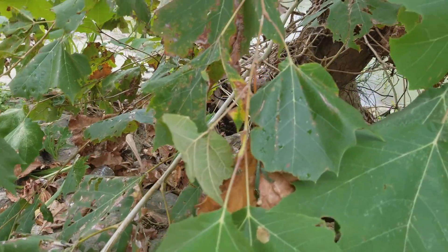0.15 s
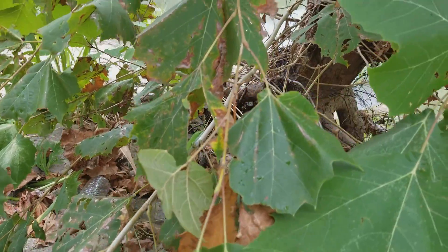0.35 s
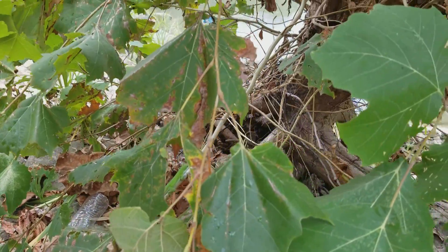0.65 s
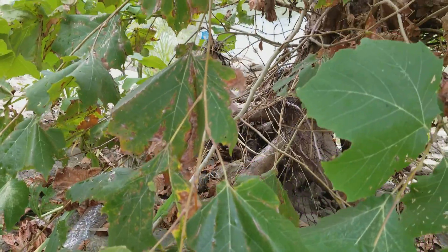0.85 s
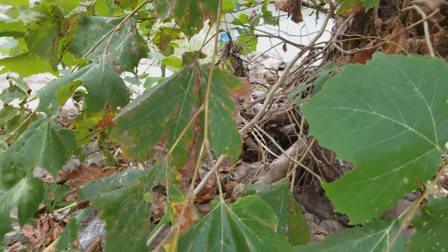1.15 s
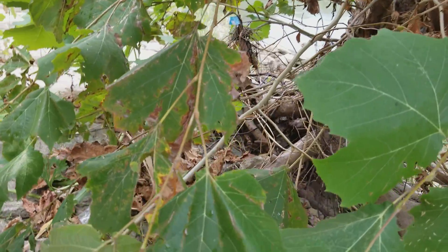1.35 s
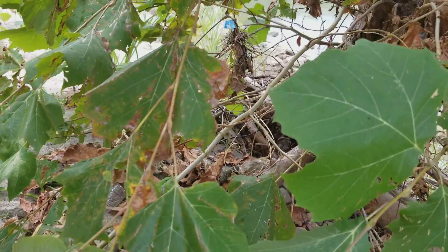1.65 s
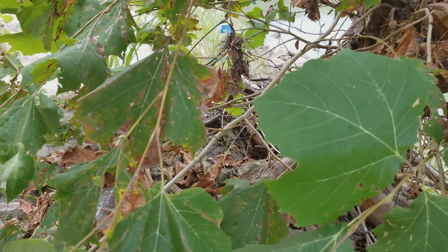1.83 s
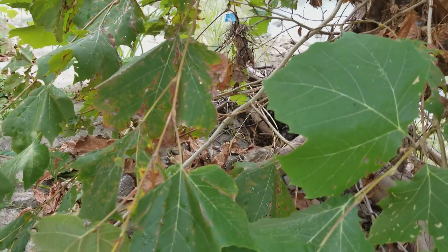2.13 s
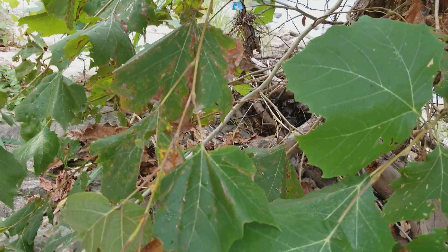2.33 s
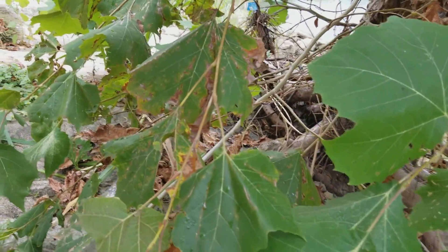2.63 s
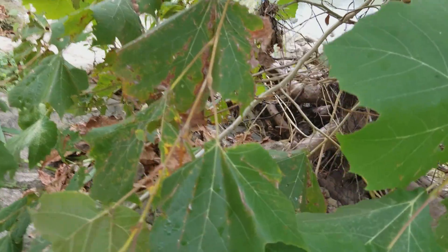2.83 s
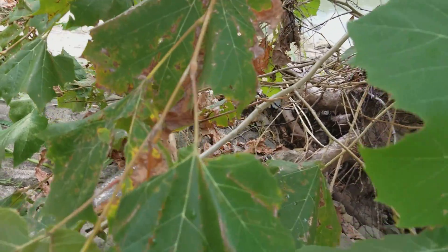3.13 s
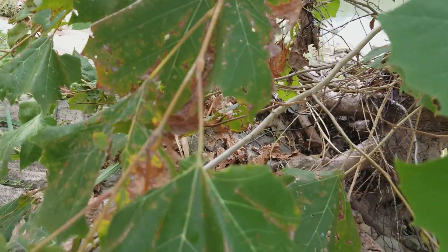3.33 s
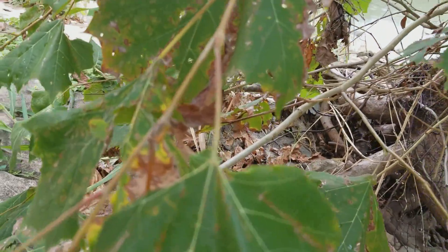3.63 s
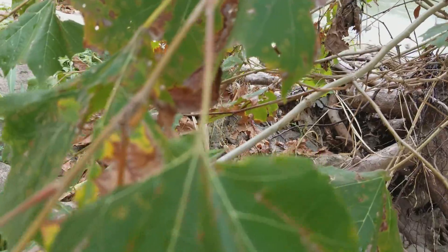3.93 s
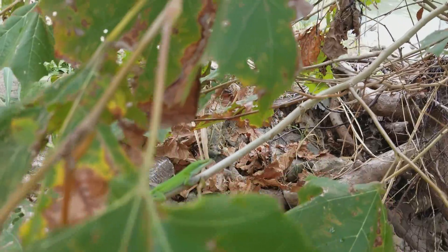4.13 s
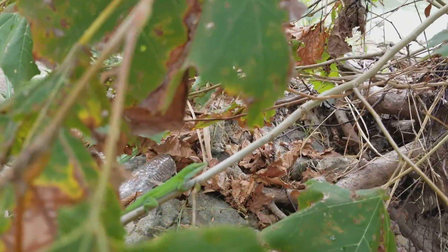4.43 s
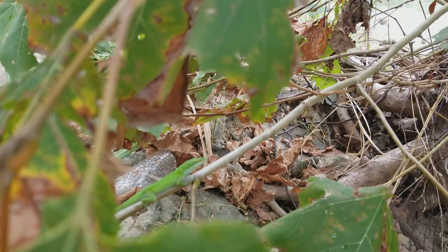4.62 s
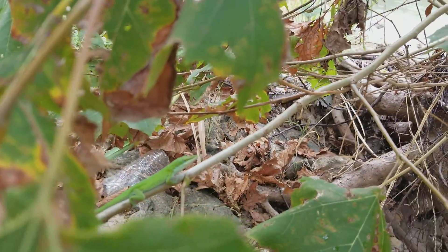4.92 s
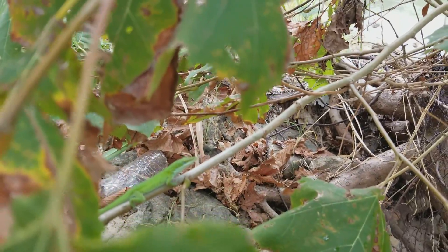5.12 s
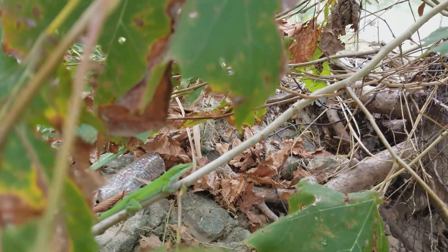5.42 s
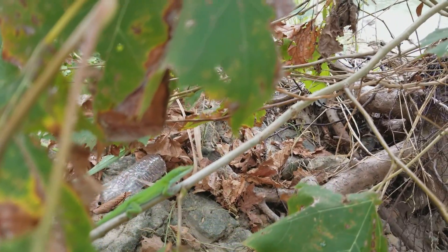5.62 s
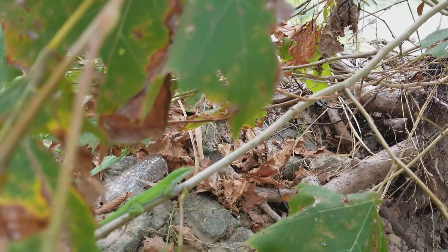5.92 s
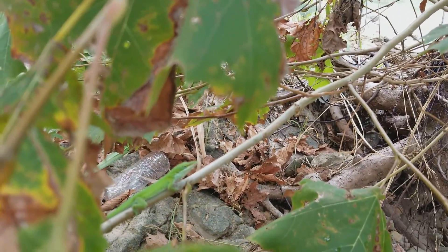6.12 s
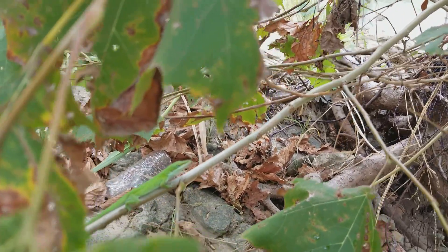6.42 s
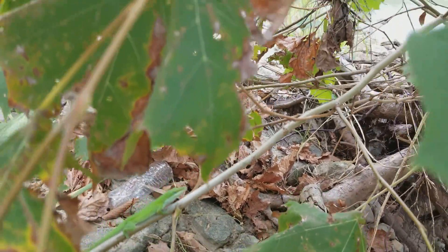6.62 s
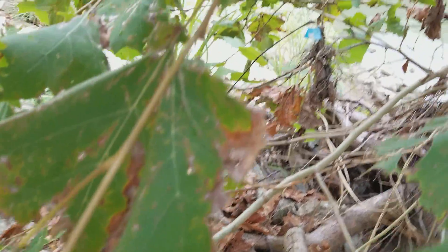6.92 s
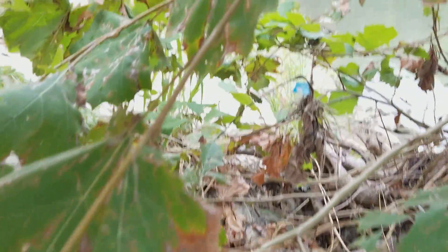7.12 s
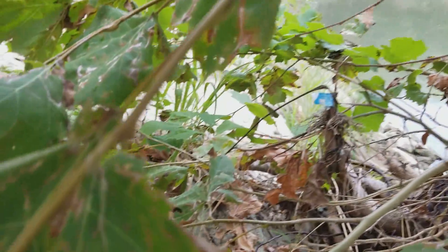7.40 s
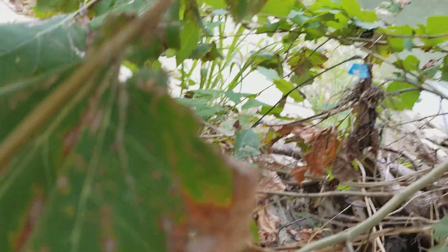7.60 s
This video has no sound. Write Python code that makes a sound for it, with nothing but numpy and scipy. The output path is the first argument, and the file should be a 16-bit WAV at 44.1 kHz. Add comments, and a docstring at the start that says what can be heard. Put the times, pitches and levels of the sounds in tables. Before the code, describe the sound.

From 0 to 0.5 s a leaf scrapes grainily over the left side of the microphone, with loud flicks and an airy pop at about 0.3 s and a last flick as it slips off near 0.48 s. A high pulsing bush cricket buzzes until 1.7 s, with light twig ticks and thin rising bird calls. From 2.3 to 2.8 s leaves swish, litter crunches, a sharp twig cracks at 2.5 s and a dull knock bumps the camera at 2.7 s. The loud cricket returns from 2.6 to 5.2 s; birds chirp and slur around 3 s, faint far tones swell briefly, and crisp snaps come near 3.8 s. A quick bird trill runs from 4.3 to 5 s, and soft whistles follow at 5.3 and 7.4 s. From 6.4 to 7.7 s brush swishes, crunches and snaps again. Deep rumble, swelling low rush and thin hiss continue throughout.

```python
"""A leaf scrapes over the left microphone and flicks off it: grainy friction noise, short bursts and air taps.
Someone edges through dry brush with a handheld camera: crackle swishes and crunches, noise bursts snap as
twigs, and damped sines bump the camera. Small birds (gliding sines) and bush crickets (pulsed high noise) sing
over a far drone of wavering tones, a deep rumble, a swelling low rush and a thin hiss (shaped noise)."""
import sys
import numpy as np
from scipy import signal
from scipy.fft import rfft, irfft, next_fast_len
from scipy.io import wavfile
from scipy.ndimage import uniform_filter1d, map_coordinates

SR = 44100
rng = np.random.default_rng(int(sys.argv[2]) if len(sys.argv) > 2 else 0)


def master_out(mix):
    """Clip the mix to full scale and print it as 16-bit PCM to the path in sys.argv[1]."""
    frames = np.transpose(np.atleast_2d(mix))
    ceiling = np.clip(frames, -1, 1)
    pcm = np.round(ceiling * 32767).astype(np.int16)
    wavfile.write(sys.argv[1], SR, pcm)


N = 342216
TIME_S = np.arange(N) / SR


def amp(db):
    """Decibels to gain."""
    return 10 ** (np.asarray(db) / 20)


def unit(x):
    """Scale to rms 1."""
    return x / np.sqrt(np.mean(x ** 2) + 1e-20)


def along(points, hz):
    """Interpolate (f/Hz, value) points on a log frequency axis."""
    f, value = np.transpose(points)
    return np.interp(np.log(hz + 1), np.log(f + 1), value)


def tilt(tilt_db, hz):
    """Treble tilt in dB: tends to tilt_db per octave at high f, flattens in the bass."""
    return tilt_db * np.log2(hz / 1000 + .5)


def wobble(rate_hz, size=N):
    """Smooth random curve, rate_hz knots per second."""
    knots = rng.standard_normal(int(size * rate_hz / SR) + 4)
    return map_coordinates(knots, [np.arange(size) * rate_hz / SR])


def swells(rows, rest_db=-120):
    """Level in dB of exponential swells (t/s, level/dB, rise/s, fall/s), power-summed on a resting level."""
    t = np.arange(0, N, 32) / SR
    power = amp(rest_db) ** 2
    for s, db, rise_s, fall_s in rows:
        power = power + (amp(db) * np.exp(np.minimum((t - s) / rise_s, (s - t) / fall_s))) ** 2
    return np.interp(TIME_S, t, 10 * np.log10(power))


def filtered(x, gain):
    """Multiply the spectrum of x by gain(hz)."""
    n = x.shape[-1]
    m = next_fast_len(n + 4096, real=True)
    return irfft(rfft(x, m) * gain(np.fft.rfftfreq(m, 1 / SR)), m)[..., :n]


def pan(db):
    """Left and right gains, mean 1, for a left-minus-right level difference."""
    g = amp([[db / 2], [-db / 2]])
    return g / g.mean()


def add(track, s, sound):
    """Mix a sound into a track from time s, clipped to the track."""
    start = round(s * SR)
    part = sound[..., max(-start, 0):max(N - start, 0)]
    track[..., max(start, 0):][..., :part.shape[-1]] += part


# left-right correlation: (f/Hz, correlation 0-1)
STEREO_CORRELATION = [(60, 1), (290, 0.94), (640, 0.69), (1400, 0.22), (3000, 0.0056)]


def spread(pair, spectrum, tilt_db=0):
    """Colour two unrelated signals into stereo of rms 1: bass shared, treble not."""
    def gain(hz):
        turn = np.arccos(np.clip(along(STEREO_CORRELATION, hz), -1, 1)) / 2
        return amp(along(spectrum, hz) + tilt(tilt_db, hz)) * [np.cos(turn), np.sin(turn)]
    mid, side = filtered(pair, gain)
    return unit(np.array([mid + side, mid - side]))


def crackle(size, rate_hz, scatter_db, smooth):
    """Tiny fractures of uneven strength, each a brief shiver, on a bed of sliding noise; two channels."""
    hits = rng.random(size) < rate_hz / SR
    strength = hits * amp(scatter_db * np.clip(rng.standard_normal(size), -2, 2))
    power_decay_s = .0004
    shiver = np.sqrt(signal.lfilter([1], [1, -np.exp(-1 / (power_decay_s * SR))], strength ** 2))
    return unit(shiver * rng.standard_normal((2, size))) + smooth * rng.standard_normal((2, size))


def patches(x, depth_db, size=128):
    """Shifting resonances of flexing matter: smoothed random gain over time and frequency; rms 1."""
    z = signal.stft(x, nperseg=size)[2]
    field = uniform_filter1d(rng.standard_normal(z.shape[-2:]), 2, 0)
    field = uniform_filter1d(field, 5, 1)
    gain = amp(depth_db * np.clip(unit(field), -2, 2))
    return unit(signal.istft(z * gain, nperseg=size)[1][..., :x.shape[-1]])


def echo(x, t60_s, onset_s):
    """Diffuse answer of the surrounding growth: decaying noise, different on each side."""
    t = np.arange(int(SR * t60_s) + 2) / SR
    tail = rng.standard_normal((2, len(t))) * amp(-60 * t / t60_s) * (1 - np.exp(-t / onset_s))
    return signal.fftconvolve(np.atleast_2d(x), tail / np.linalg.norm(tail[0]), axes=1)[:, :N]


# resonances of the leaf on the microphone port: (f/Hz, width/Hz, lift/dB)
PORT_RESONANCES = [(687, 78, 6), (936, 40, 1.5), (1130, 80, 6), (1370, 35, 2.5), (1450, 35, 2),
                   (1880, 60, 4), (2150, 66, 3), (2600, 76, 0.5), (3540, 600, 0)]


def port_colour(x, spectrum, tilt_db=0):
    """Contact sound through the resonant leaf and microphone port, rms 1."""
    def gain(hz):
        lift_db = sum(db / (1 + (2 * (hz - f) / width) ** 2) for f, width, db in PORT_RESONANCES)
        return amp(along(spectrum, hz) + lift_db + tilt(tilt_db, hz))
    return unit(filtered(x, gain))


# leaf resting on the microphone until it slides off
CONTACT_DB, RELEASE_S, RELEASE_FALL_S = -45.5, .475, 0.021
# harder drags: (t/s, level/dB, rise/s, fall/s)
HARD_DRAGS = [(.004, -30, 0.0058, 0.0041), (.055, -36, 0.027, 0.037), (.272, -35, .025, 0.032),
              (.325, -32, .015, 0.02), (.385, -32.5, 0.018, .012)]
# sliding leaf spectrum: (f/Hz, relative density/dB)
DRAG_SPECTRUM = [(50, -22.5), (250, 7), (560, 8), (1000, -1), (1350, 2), (1750, -7), (2500, -8),
                 (3900, -11.5), (5500, -23.5), (10000, -22), (15500, -33.5)]
# leaf catching and flicking: (t/s, level/dB, Gaussian sigma/s, treble tilt/dB per octave)
LEAF_FLICKS = [(.006, -24, 0.00067, 7), (0.013, -32, 0.0056, 2), (0.2218, -29, 0.00048, 0.5),
               (.3045, -19.5, 0.0027, -0.5), (0.3071, -13.5, 0.0024, 2), (.3105, -20.5, 0.0025, 1),
               (0.3207, -14.5, 0.00011, 8.5), (.3413, -27, 0.00046, -2.5), (0.459, -34, 0.0026, 3),
               (0.4794, -20, 0.00058, 11), (.491, -36, 0.0018, 6)]
# flick spectrum before tilt: (f/Hz, relative density/dB)
FLICK_SPECTRUM = [(30, -16.5), (120, 5.5), (300, -0.5), (500, -3.5), (700, -7), (1000, -1), (1250, -1),
                  (1750, -10.5), (2400, -10.5), (3900, -15.5), (6000, -24), (10000, -30), (15500, -31)]
# leaf edge tapping the port: (t/s, peak/dB, decay/s)
PORT_TAPS = [(0.3187, -3.5, 0.00044), (0.3422, -16.5, 0.0015)]


def leaf_on_microphone():
    """A leaf drags over the left port, sticks and slips free; little of it leaks to the right one."""
    touching = np.exp(-np.maximum(TIME_S - RELEASE_S, 0) / RELEASE_FALL_S)
    grains = crackle(N, rate_hz=650, scatter_db=5.0, smooth=0.6)[0]
    friction = port_colour(patches(grains, depth_db=4.0, size=512), DRAG_SPECTRUM)
    left = touching * amp(swells(HARD_DRAGS, CONTACT_DB) + 0.74 * wobble(90)) * friction
    t = np.arange(-SR // 20, SR // 20) / SR
    for s, db, sigma_s, tilt_db in LEAF_FLICKS:
        shape = np.exp(-.5 * (t / sigma_s) ** 2)
        slip = port_colour(shape * rng.standard_normal(len(t)), FLICK_SPECTRUM, tilt_db)
        add(left, s + t[0], amp(db) * slip * np.sqrt(np.mean(shape ** 2)))
    for s, db, decay_s in PORT_TAPS:
        u = t[t >= 0] / decay_s
        add(left, s, amp(db) * (1 - u) * np.exp(-u))  # a push of air and its rebound
    leak_db = [(100, -20), (1300, -49.5), (5000, -35), (14000, -24.0)]  # (f/Hz, gain/dB)
    right = filtered(left, lambda hz: amp(along(leak_db, hz)))
    return np.array([left, right])


# dull bumps on the camera: (t/s, left-right mean peak/dB, f/Hz, t60/s, left minus right/dB)
CAMERA_BUMPS = [(0.308, -30, 152, 0.055, 27), (.319, -38, 375, 0.053, 34), (.341, -30.5, 315, 0.064, 40),
                (0.379, -30, 248, 0.015, 42), (.478, -32, 285.3, 0.012, 25), (2.7165, -26, 514, 0.021, 4),
                (2.7152, -28.5, 233, 0.029, 1.5), (2.7202, -37, 157, 0.053, 0), (7.15, -39, 266, 0.022, 1)]


def bumps():
    """Soft knocks set the camera body swinging for a few cycles: damped sines."""
    out, t = np.zeros((2, N)), np.arange(SR // 8) / SR
    for s, db, hz, t60_s, lean_db in CAMERA_BUMPS:
        onset = (1 - np.exp(-t / 0.00071)) ** 2
        swing = np.sin(2 * np.pi * hz * t) * amp(-60 * t / t60_s) * onset
        add(out, s, -amp(db) * pan(lean_db) * swing / abs(swing).max())
    return out


CALM_DB, STIR_FLUTTER_DB = -88, 6  # foliage left alone; leaves catch and let go
# swells of stirring foliage, before flutter: (t/s, level/dB, rise/s, fall/s)
FOLIAGE_STIRS = [(.1, -66, .2, .25), (2.0, -69, .08, .07), (2.58, -54, .2, .1), (2.97, -58.5, .08, .28),
                 (4.4, -73, .5, .5), (5.05, -67, .1, .14), (5.47, -64.5, .12, .18), (6.5, -65, .14, .2),
                 (6.87, -59.5, .1, .17), (7.3, -60, .09, .1), (7.52, -57.5, .08, .25)]
SWISH_GAIN_DB = 4
# leaves sweeping past: (t/s, level/dB before SWISH_GAIN_DB, rise/s, fall/s, treble tilt/dB per octave)
LEAF_SWISHES = [(.463, -57.5, .008, .012, 1.5), (2.388, -46.5, 0.028, 0.05, -1.4),
                (2.536, -47, 0.033, 0.032, -0.4), (6.435, -51, 0.03, 0.023, 1),
                (6.495, -47.5, 0.0036, 0.0085, -2), (6.86, -57, 0.06, 0.02, 4.5),
                (6.898, -43.5, 0.0017, 0.0056, -2.5), (6.922, -42.5, 0.02, 0.015, 2),
                (7.033, -41, 0.0037, 0.0047, -6), (7.154, -56.5, .001, 0.026, -7),
                (7.343, -48, 0.00061, .003, -8), (7.604, -46.5, .001, 0.0037, -4.5)]
# leaf spectrum: (f/Hz, relative density/dB)
LEAF_SPECTRUM = [(150, -25.5), (450, -12.5), (700, -7.5), (1200, -4), (1750, 0.5), (2300, 0), (2900, -2.5),
                 (3700, 0.5), (5000, 2), (7000, -2), (10000, -1), (15500, -9.5)]


def foliage():
    """Leaves stir in clumps of fine crackle and swell into a swish where one sweeps past."""
    grains = spread(crackle(N, rate_hz=710, scatter_db=1, smooth=1.0), LEAF_SPECTRUM)
    stir = patches(grains, depth_db=2.0, size=256)
    flutter_db = STIR_FLUTTER_DB * wobble(11) + 0.92 * wobble(70)
    out = amp(swells(FOLIAGE_STIRS, CALM_DB) + flutter_db) * stir
    t = np.arange(-SR // 5, SR // 4) / SR
    for s, db, rise_s, fall_s, tilt_db in LEAF_SWISHES:
        swell = np.exp(np.minimum(t / rise_s, -t / fall_s)) * amp(1.5 * wobble(153, len(t)))
        grains = spread(crackle(len(t), rate_hz=710, scatter_db=-1, smooth=1.0), LEAF_SPECTRUM, tilt_db)
        swish = swell * patches(grains, depth_db=0.5, size=256)
        add(out, s + t[0], amp(db + SWISH_GAIN_DB) * swish)
    return out


STEP_FALL_S = 0.033  # the crunch dies once the weight has settled
SHUFFLE_DB = -14  # litter shifting underfoot, relative to the stirring
# feet pressing into the leaf litter: (t/s, level/dB, rise/s)
FOOTSTEPS = [(2.385, -48.5, 0.022), (2.53, -53.5, 0.038), (2.7, -52, 0.019), (6.8, -59.5, .025),
             (6.9, -45.5, 0.023), (7.03, -55, 0.024), (7.16, -61.5, .015)]
# crushed litter spectrum: (f/Hz, relative density/dB)
LITTER_SPECTRUM = [(200, -10), (450, -3.5), (660, 6), (880, -3.5), (1200, -11), (1850, -11.5), (2600, -15),
                   (5000, -28), (10000, -50.5)]


def tread():
    """Weight settles on the litter: a dull, grainy crunch, with a faint shuffle while the foliage stirs."""
    steps = amp(swells([(s, db, rise_s, STEP_FALL_S) for s, db, rise_s in FOOTSTEPS]))
    shuffle = amp(swells(FOLIAGE_STIRS, CALM_DB) + SHUFFLE_DB)
    grains = spread(crackle(N, rate_hz=900, scatter_db=3, smooth=0.71), LITTER_SPECTRUM)
    crunch = patches(grains, depth_db=6.0, size=512)
    return np.hypot(steps, shuffle) * amp(1.5 * wobble(54)) * crunch


TICK_COUNT, TICK_HZ, TICK_OCTAVES = 140, 2097, .4  # middle pitch and its spread
# level at mean stirring before SNAP_GAIN_DB, dB per dB of stirring, spread
TICK_DB, TICK_FOLLOW, TICK_SCATTER_DB = -55, .45, 3.5


def ticks():
    """Small ticks (t/s, level/dB, f/Hz) come thicker and louder while the foliage stirs."""
    stir_db = swells(FOLIAGE_STIRS, CALM_DB)
    busy_db = TICK_FOLLOW * (stir_db - stir_db.mean())
    due = np.cumsum(amp(busy_db))
    quantiles = (np.arange(TICK_COUNT) + rng.random(TICK_COUNT)) / TICK_COUNT
    times_s = np.interp(quantiles, due / due[-1], TIME_S)
    size, thinness = np.clip(rng.standard_normal((TICK_COUNT, 2)), -2, 2).T
    levels_db = TICK_DB + busy_db[(times_s * SR).astype(int)] + TICK_SCATTER_DB * size
    return list(zip(times_s, levels_db, TICK_HZ * 2 ** (TICK_OCTAVES * thinness)))


SNAP_GAIN_DB = 3
# twigs and brittle leaves snapping: (t/s, peak level/dB before SNAP_GAIN_DB and pan, f/Hz)
TWIG_SNAPS = [(.548, -47, 1930), (.765, -47.5, 3020), (.846, -49, 2000), (1.089, -53.5, 1600),
              (1.206, -53.5, 2490), (1.507, -49, 3080), (1.725, -45.5, 5500), (2.259, -44, 6000),
              (2.386, -35.5, 2000), (2.534, -24.5, 2200), (2.73, -38.5, 2600), (3.746, -29.5, 13000),
              (3.747, -39, 4020), (3.873, -32.5, 4000), (3.874, -31.5, 12600), (4.308, -45.5, 2350),
              (4.951, -46.5, 2470), (5.807, -47.5, 7200), (6.205, -37, 7400), (6.437, -27.5, 11580),
              (6.879, -37, 1460), (6.899, -33, 1970), (7.017, -37, 1730), (7.152, -47, 1300),
              (7.245, -41.5, 2970), (7.342, -40.5, 3000), (7.505, -40, 4500), (7.605, -33.5, 2540)]


def twigs():
    """Each snap is a band-passed sharp crack and a brief shiver; thinner twigs sound higher."""
    out, t = np.zeros((2, N)), np.arange(SR // 12) / SR
    for s, db, pitch_hz in list(TWIG_SNAPS) + ticks():
        noise = patches(rng.standard_normal((2, len(t))), depth_db=6.0)
        burst = noise * (amp(-60 * t / 0.02) + amp(-18 - 60 * t / 0.1))
        width_hz = min(1.1 * pitch_hz, 4000)

        def resonance(hz):
            damping = 1j * hz * width_hz
            return damping / (pitch_hz ** 2 - hz ** 2 + damping)
        crack = filtered(burst, resonance)
        add(out, s, amp(db + SNAP_GAIN_DB) * crack / abs(crack).max())
    return out * pan(1.1)


# all bird levels are at the source, before the distance gains in birds()
TSIP_FROM_HZ, TSIP_TO_HZ, TSIP_S, TSIP_RASP = 6850, 7500, 0.085, .9  # one small bird's thin rising call
TSIP_WANDER_HZ = 111  # no two calls sit at quite the same pitch
# its single calls: (t/s, source level/dB)
TSIP_CALLS = [(0.639, -69), (0.787, -61.5), (1.912, -63), (2.874, -57), (3.376, -62.5), (3.595, -59.5),
              (4.03, -62.5), (5.335, -61.5), (6.106, -55)]
# a similar call, run together; loudest and highest in the middle
TRILL_NOTES, TRILL_START_S, TRILL_GAP_S, TRILL_NOTE_S = 7, 4.345, .098, .07
TRILL_DB, TRILL_ARCH_DB, TRILL_ARCH_HZ = -56, 2, 286
TRILL_FROM_HZ, TRILL_TO_HZ, TRILL_RASP = 6850, 7660, 0.93
WHISTLE_HZ, WHISTLE_S, WHISTLE_RASP = 2930, 0.14, 0.11  # a second bird holds one note...
# ...and ends on a softer, falling one
DROP_AFTER_S, DROP_S, DROP_TO_HZ, DROP_DB, DROP_RASP = .21, .1, 2520, -8, .4
# its phrases: (t/s, source level/dB)
WHISTLE_PHRASES = [(4.44, -71), (5.325, -60.5), (7.44, -53.5)]
# slurs and buzzes of other birds: (t/s, length/s, start f/Hz, end f/Hz, source level/dB, rasp 0-1)
BIRD_SLURS = [(.81, .12, 4000, 4380, -71, .9), (.909, 0.037, 3900, 3065, -65, .3),
              (2.922, .064, 2590, 2794, -59, 0.46), (3.03, 0.065, 5130, 4750, -60, 0.2),
              (3.141, 0.059, 2880, 2310, -62.5, 0.02), (3.239, .054, 2880, 2950, -63, 0.4),
              (3.317, .06, 5520, 4810, -58, 0.2), (3.37, 0.074, 4800, 4845, -59.5, 0.19),
              (3.909, 0.32, 3790, 3810, -61.5, 0.71), (5.844, 0.11, 5440, 5910, -60.5, .25),
              (7.69, 0.12, 4500, 4670, -60, 0.64)]


def notes():
    """Bird notes (t/s, length/s, start f/Hz, end f/Hz, level/dB, rasp): calls, trill, phrases, slurs."""
    rows = []
    for s, db in TSIP_CALLS:
        lift_hz = TSIP_WANDER_HZ * rng.standard_normal()
        rows.append((s, TSIP_S, TSIP_FROM_HZ + lift_hz, TSIP_TO_HZ + lift_hz, db, TSIP_RASP))
    for k, edge in enumerate(np.linspace(-1, 1, TRILL_NOTES) ** 2):
        s = TRILL_START_S + k * TRILL_GAP_S
        lift_hz = TSIP_WANDER_HZ * rng.standard_normal() - TRILL_ARCH_HZ * edge
        db = TRILL_DB - TRILL_ARCH_DB * edge
        rows.append((s, TRILL_NOTE_S, TRILL_FROM_HZ + lift_hz, TRILL_TO_HZ + lift_hz, db, TRILL_RASP))
    for s, db in WHISTLE_PHRASES:
        rows.append((s, WHISTLE_S, WHISTLE_HZ, WHISTLE_HZ, db, WHISTLE_RASP))
        rows.append((s + DROP_AFTER_S, DROP_S, WHISTLE_HZ, DROP_TO_HZ, db + DROP_DB, DROP_RASP))
    return rows + list(BIRD_SLURS)


def birds():
    """Distant whistles slide and level off; a fast flutter of pitch makes them rasp."""
    song = np.zeros(N)
    for s, length_s, start_hz, end_hz, db, rasp in notes():
        size = int(length_s * SR)
        u = np.linspace(0, 1, size)
        flutter_hz = 300 * np.sin(2 * np.pi * 135 * u * length_s) + 230 * wobble(900, size)
        glide_hz = end_hz + (start_hz - end_hz) * (1 - u) ** 1.6
        hz = glide_hz + rasp * flutter_hz + 18 * wobble(300, size)
        envelope = amp(db + 1.56 * wobble(56.7, size)) * np.sqrt(2 * abs(np.sin(np.pi * u)))
        add(song, s, envelope * np.sin(2 * np.pi * np.cumsum(hz) / SR))
    near_echo = amp(-4.5) * echo(song, t60_s=0.066, onset_s=0.0012)
    far_echo = amp(-6) * echo(song, t60_s=.55, onset_s=0.025)
    return amp(-7) * song + near_echo + far_echo


CRICKET_GAIN_DB, BOUT_RISE_S, BOUT_FALL_S = 4.5, 0.22, .1
# cricket rasp spectrum: (f/Hz, relative density/dB)
WING_SPECTRUM = [(5000, -44), (8000, -15), (10300, -15.5), (11100, -6), (11700, -6), (12300, -2.5),
                 (13200, 0), (15600, 2.5)]


def cricket(start_s, stop_s, db, stroke_hz, depth, lean_db):
    """One bout of a bush cricket: every wing stroke swells a very high rasp."""
    singing = np.clip(np.minimum((TIME_S - start_s) / BOUT_RISE_S, (stop_s - TIME_S) / BOUT_FALL_S), 0, 1)
    phase = 2 * np.pi * np.cumsum(stroke_hz + .25 * wobble(1.496)) / SR
    strokes = unit(1 + np.clip(depth, 0, 1) * np.sin(phase))
    rasp = spread(rng.standard_normal((2, N)), WING_SPECTRUM)
    return amp(db + CRICKET_GAIN_DB) * singing * strokes * pan(lean_db) * rasp


# bush cricket bouts: (start t/s, stop t/s, level/dB before CRICKET_GAIN_DB and pan, stroke f/Hz,
# stroke depth 0-1, left minus right/dB)
CRICKET_BOUTS = [(-.3, 1.68, -59.5, 40, .42, 1.5), (-.3, 3.5, -69.5, 15.5, 0.29, 1.5),
                 (2.6, 5.2, -56.5, 40, .42, 1.5), (2.8, 8.7, -63.5, 26.9, .25, 7)]


def crickets():
    """Three singers, each at its own stroke rate; the loudest pauses and starts again."""
    return sum(cricket(*bout) for bout in CRICKET_BOUTS)


# faint far drone swell: (t/s, level/dB before each tone's own, rise/s, fall/s)
DRONE_SWELL = [(3.03, -62, 0.88, 0.18)]
# its tones: (f/Hz, level/dB re swell)
DRONE_PARTIALS = [(410, 0.5), (447, -2), (544, -4), (668, -6), (813, -15.5)]


def drone():
    """A few far tones swell together, each wavering in pitch and level on its own."""
    swell_db = swells(DRONE_SWELL)
    out = 0
    for hz, db in DRONE_PARTIALS:
        level = amp(swell_db + db + 2 * wobble(2))
        out = out + level * np.sin(2 * np.pi * np.cumsum(hz + 5 * wobble(45)) / SR)
    return out


RUMBLE_GAIN_DB, HISS_DB = 3, -64
RUSH_DB = -60  # low rush between its swells, before wobble
SURGE_TILT_DB = 11  # treble tilt of the rush, dB per octave: minus for dark, plus for bright
# deep rumble: (t/s, level/dB before RUMBLE_GAIN_DB)
RUMBLE_LEVELS = [(0, -54.5), (1.05, -61.5), (2.4, -56), (7.76, -57.5)]
# slow swells of the low rush: (t/s, level/dB before wobble, half width/s, brightness 0-1)
RUSH_SURGES = [(1.93, -52.5, .22, .5), (2.379, -52.5, .2, .45), (3.2, -55.5, .35, .5),
               (3.95, -59.5, .3, .25), (4.56, -53.5, 0.37, 0.5), (5.27, -55, .15, .05),
               (6.9, -61.5, 0.69, .7)]
# rumble, rush (before tilt) and hiss spectra: (f/Hz, relative density/dB)
RUMBLE_SPECTRUM = [(20, -17.5), (40, -11), (62, 0), (90, 2), (140, -0.5), (220, -10), (400, -24),
                   (900, -57)]
RUSH_SPECTRUM = [(80, -29), (180, -1.5), (270, 0.5), (390, -2.5), (520, -12.5), (750, -25), (1300, -47),
                 (3000, -61.5)]
HISS_SPECTRUM = [(600, -2.5), (1500, -7), (3000, -6), (5000, -3.5), (8000, -2), (11000, -12), (15500, 4.5)]


def background():
    """Shaped noise: a deep rumble, a low rush with darker or brighter slow swells, a thin even hiss."""
    power = np.full((2, N), amp(RUSH_DB) ** 2 / 2)  # dark, bright
    for s, db, width_s, brightness in RUSH_SURGES:
        shares = np.clip([[1 - brightness], [brightness]], 0, 1)
        power += shares * amp(db) ** 2 * np.exp(-((TIME_S - s) / width_s) ** 2)
    dark, bright = np.sqrt(power) * amp(1.4 * wobble(8.7))

    def noise(spectrum, tilt_db=0):
        return spread(rng.standard_normal((2, N)), spectrum, tilt_db)
    rush = dark * noise(RUSH_SPECTRUM, -SURGE_TILT_DB) + bright * noise(RUSH_SPECTRUM, SURGE_TILT_DB)
    rumble_db = np.interp(TIME_S, *np.transpose(RUMBLE_LEVELS))
    rumble = amp(rumble_db + RUMBLE_GAIN_DB + 0.54 * wobble(5)) * noise(RUMBLE_SPECTRUM)
    hiss = amp(HISS_DB + .5 * wobble(3.9)) * noise(HISS_SPECTRUM)
    return pan(db=0.46) * (rumble + rush + hiss)


def scene():
    """Everything heard from among the branches."""
    brush = foliage() + tread() + twigs()
    brush_echo = amp(-9) * echo(brush, t60_s=0.18, onset_s=0.0036)
    near = leaf_on_microphone() + bumps() + brush + brush_echo
    return near + birds() + crickets() + drone() + background()


TOP_HZ = 15950


def record(dry):
    """The camera keeps nothing above its band limit."""
    return filtered(dry, lambda hz: hz < TOP_HZ)


dry = scene()
out = record(dry)
master_out(out)
```